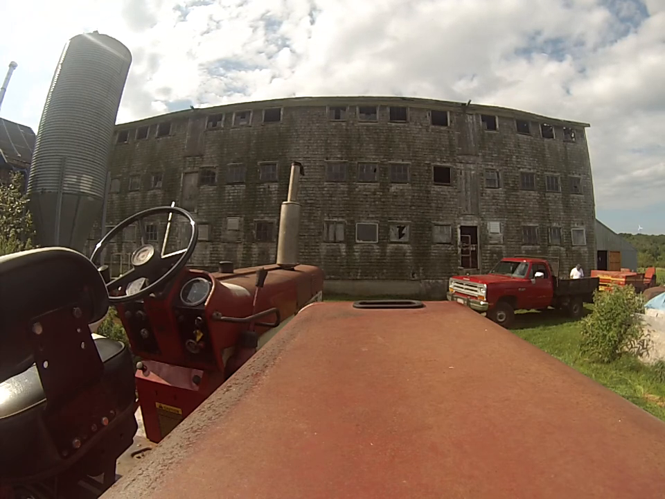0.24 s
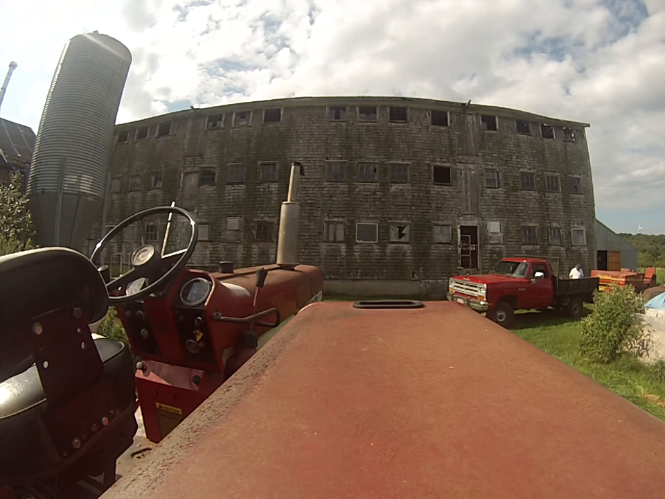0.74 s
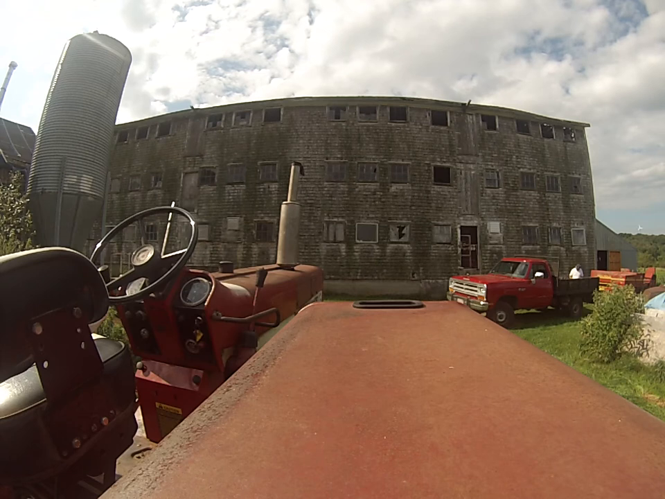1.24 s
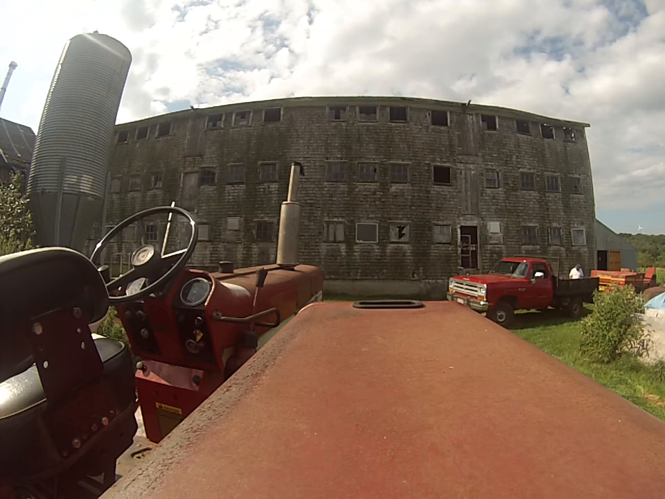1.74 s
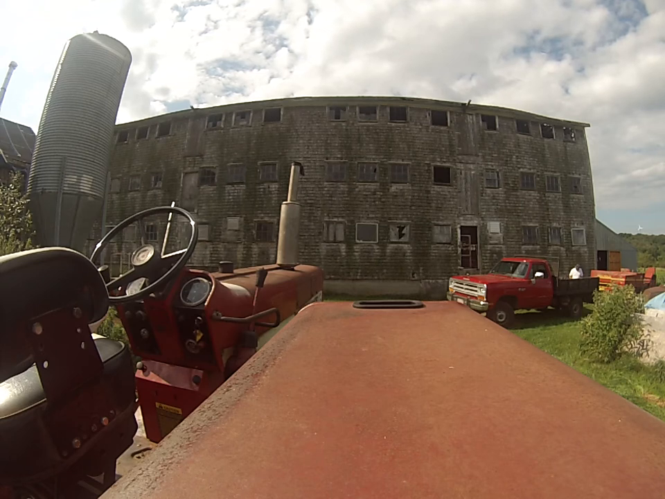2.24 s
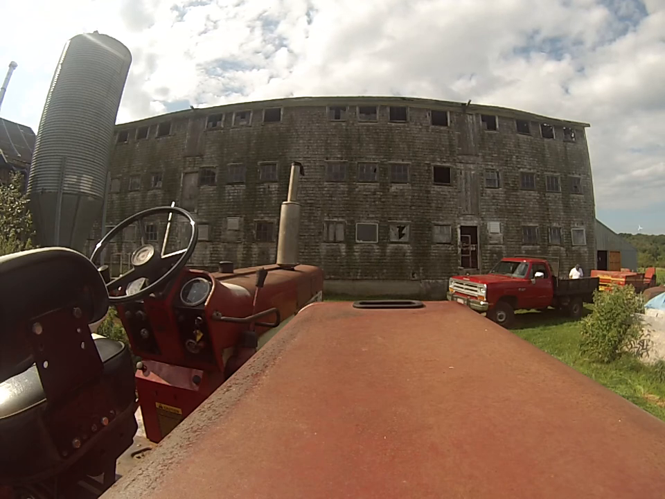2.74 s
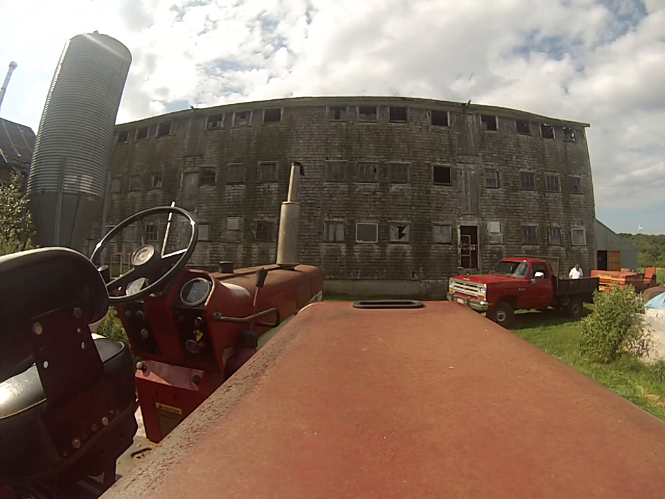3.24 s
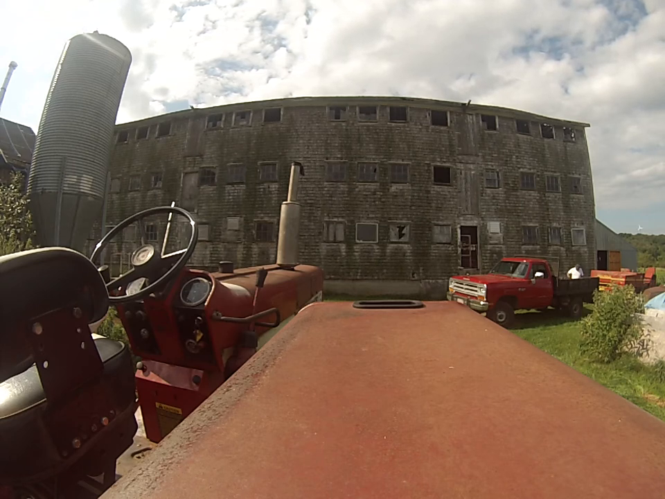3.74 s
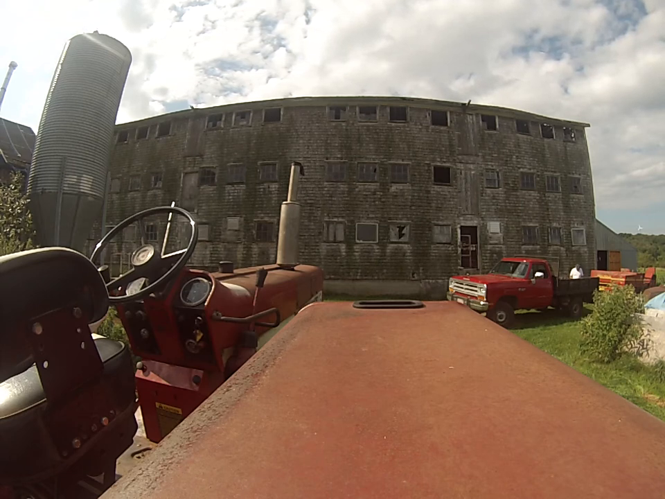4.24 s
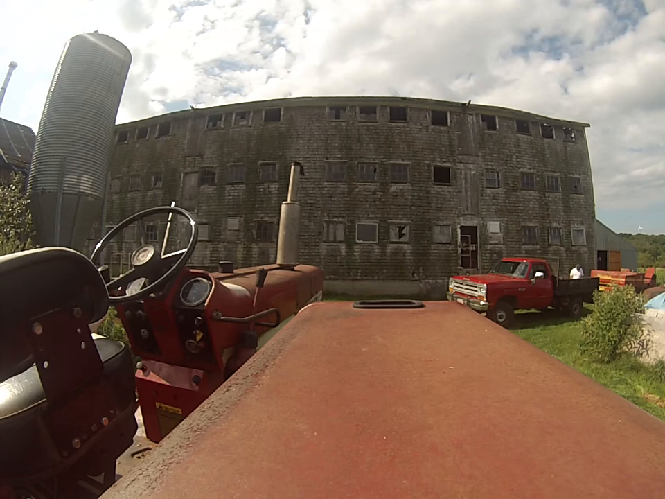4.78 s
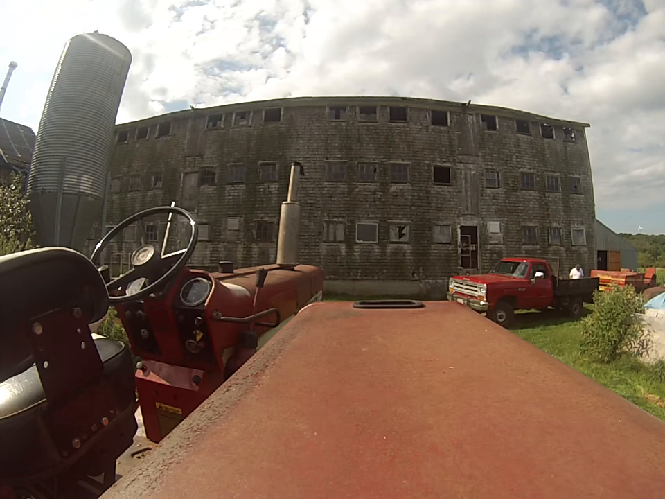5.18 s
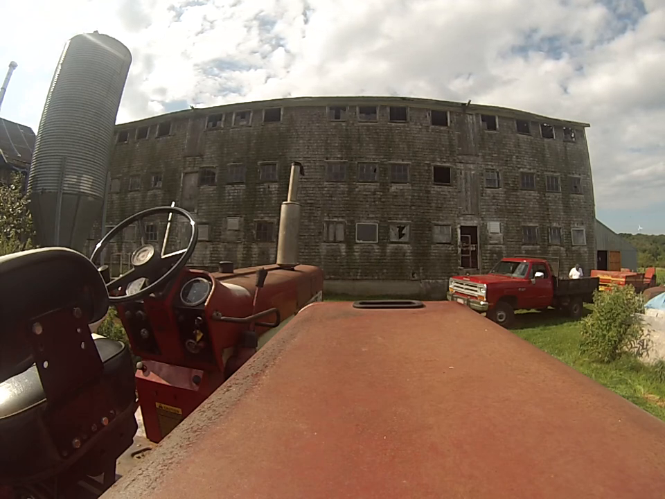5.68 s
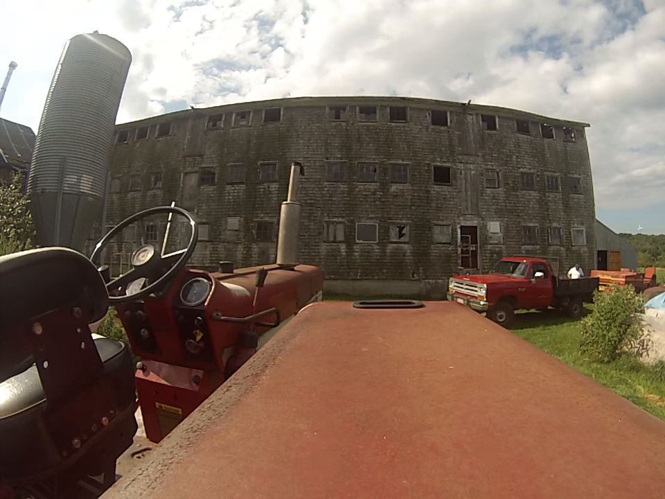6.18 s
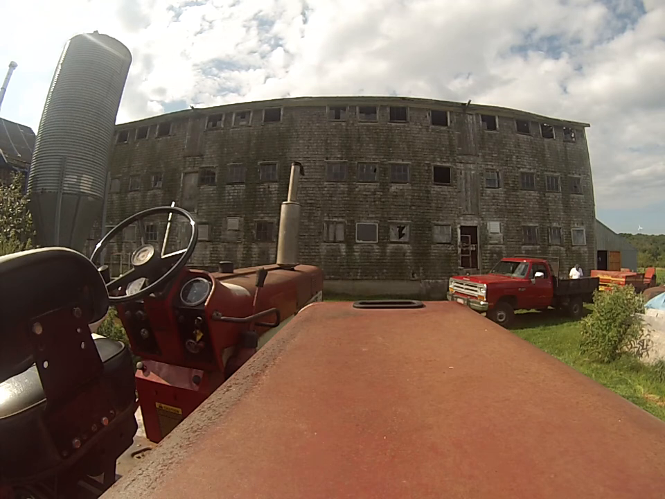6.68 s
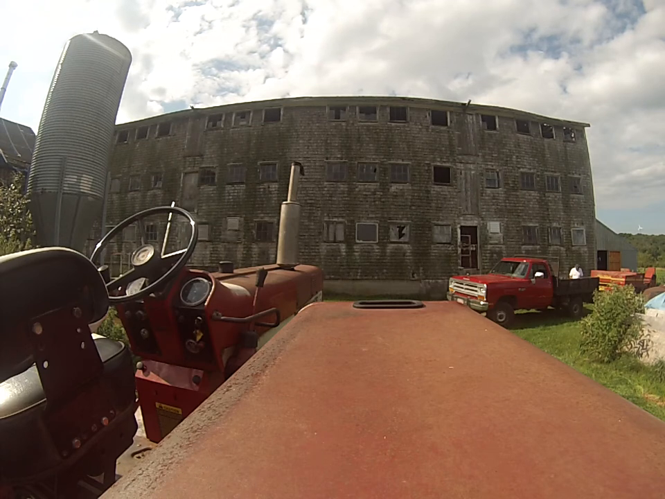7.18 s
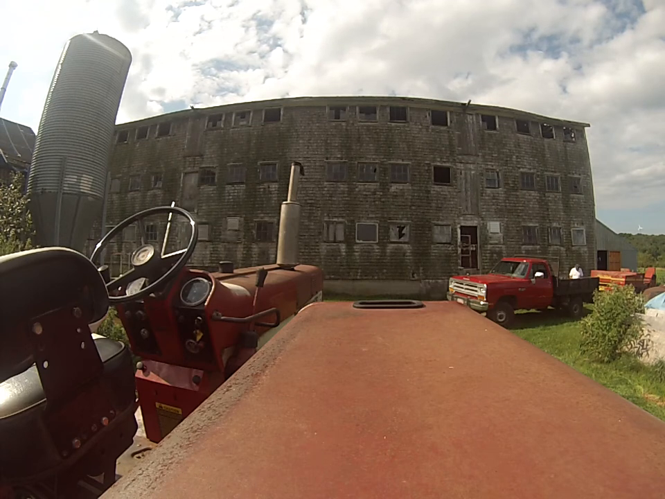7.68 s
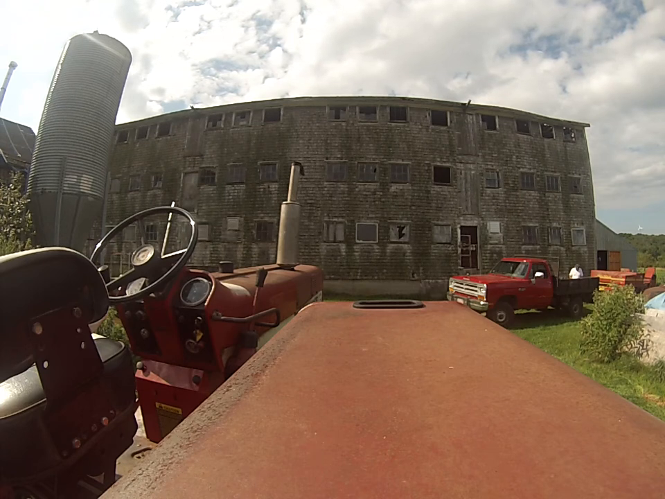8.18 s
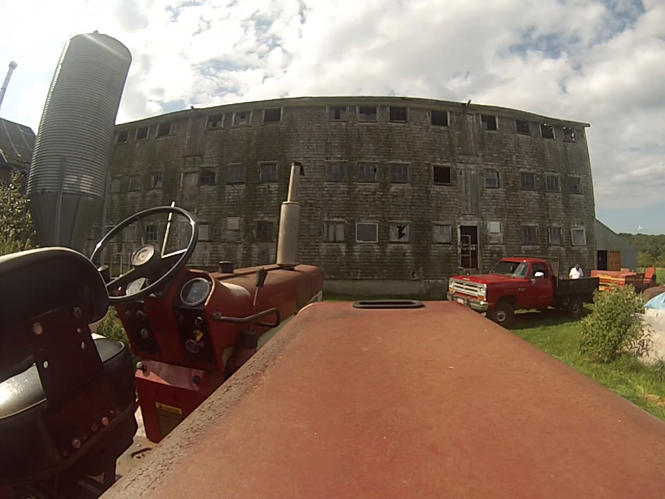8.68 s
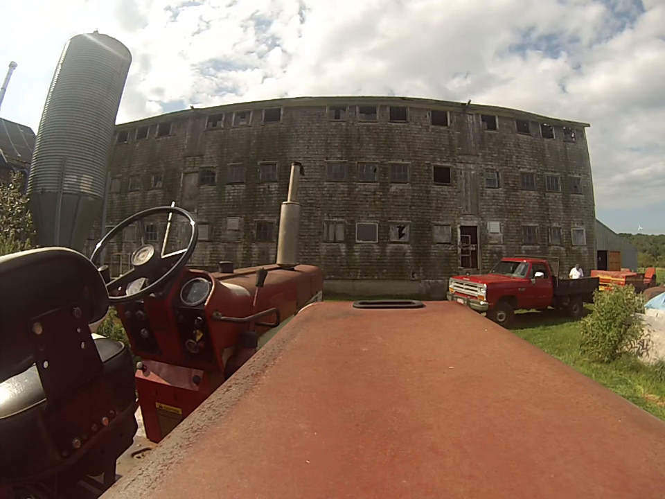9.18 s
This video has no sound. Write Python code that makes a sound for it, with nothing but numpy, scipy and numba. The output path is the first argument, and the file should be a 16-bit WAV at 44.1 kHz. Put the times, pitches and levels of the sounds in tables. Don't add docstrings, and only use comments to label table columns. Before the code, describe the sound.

A small camera's microphone sits outdoors in a breezy farmyard with parked, silent machinery. Throughout, ground crickets trill very high in fast, steady pulses, two near singers above a blurred crowd, with a slightly lower field cricket shimmer. Short double or triple chirps come near 0, 1, 2.2, 4.1, 6.1, 8 and 9.2 seconds. Distant barn hens form a hollow murmur, with soft clucks standing out in the first second, around 5 to 6, and at 8.7. Leaves and yard hum whisper beneath. Low wind rumbles unevenly, striking the microphone at 1.3 and hardest at 1.6, again at 3.9, easing, then thumping in a burst from 8.8 to 9.2. Near 5 a small bird drops three quick, faint notes. Faint low moans of air across a cavity rise slightly at 5.6, 6.6 and 8. The sound is almost mono, with little reverberation, and ends still breezy at about 9.4.

```python
import sys
import numpy as np
from scipy import signal
from scipy.fft import rfft, irfft
from scipy.io import wavfile
from scipy.ndimage import uniform_filter1d
from numba import njit

SR = 44100
rng = np.random.default_rng(int(sys.argv[2]) if len(sys.argv) > 2 else 0)


def waveform_to_disk(signal):
    frames = np.transpose(np.atleast_2d(signal))
    scaled = np.clip(frames, -1, 1) * 32767
    samples = np.round(scaled).astype(np.int16)
    wavfile.write(sys.argv[1], SR, samples)


def invert_db(level):
    return 10 ** (np.asarray(level, dtype=float) / 20)


N = 415422
T = np.arange(N) / SR


def level(x, db):
    return x * invert_db(db) / np.sqrt(np.mean(x ** 2))


def curve(rows):
    s, *columns = np.transpose(rows)
    return [np.interp(T, s, c) for c in columns]


def band(x, lo_hz, hi_hz, order=2):
    return signal.sosfilt(signal.butter(order, [lo_hz, hi_hz], "band", fs=SR, output="sos"), x)


def smooth(x, cutoff_hz):
    return signal.sosfilt(signal.butter(2, cutoff_hz, fs=SR, output="sos"), x)


def sparse(per_second):
    return (rng.random(N) < per_second / SR) * rng.standard_normal(N)


def walk(rate):
    k = int(SR / rate)
    held = np.repeat(rng.standard_normal(N // k + 1), k)
    return 1.3 * uniform_filter1d(uniform_filter1d(held, k), k)[:N]


def drift(rate):
    count = int(rate * N / SR) + 2
    return np.interp(T, np.arange(count) / rate, rng.standard_normal(count))


def coloured(points):
    hz, db = np.transpose(points)
    shape = invert_db(np.interp(np.log(np.fft.rfftfreq(N, 1 / SR) + 1), np.log(hz), db))
    return irfft(rfft(rng.standard_normal(N)) * shape, N)


def scatter(x, t60_s, wet_db):
    t = T[:SR // 4]
    tail = rng.standard_normal(len(t)) * np.exp(-np.log(1000) * t / t60_s)
    return x + invert_db(wet_db) * signal.fftconvolve(x, tail / np.sqrt(np.sum(tail ** 2)))[:N]


# frequency in Hz, spectrum level in dB per Hz.
YARD_SPECTRUM = [(60, -9.5), (200, 1), (400, -4), (700, -5), (1300, -10), (2200, -14.5), (3200, -15.5),
                 (4500, -18), (6000, -19.5), (8500, -29.5), (9500, -30), (13000, -34), (15500, -38.5)]


def distant_yard():
    return level(coloured(YARD_SPECTRUM), -57.5) * invert_db(0.53 * walk(1.3))


# time in seconds, level in dB.
LEAF_LEVELS = [
    (0.0, -66.5),
    (1.76, -65),
    (2.57, -64.5),
    (3.09, -65),
    (4.14, -64.5),
    (5.93, -66),
    (9.42, -65.5),
]


def leaf_rustle(yard):
    leaves_db = curve(LEAF_LEVELS)[0]
    swell = invert_db(1.4 * (leaves_db - leaves_db.mean()))
    return band(yard, 2000, 7100, order=1) * (swell - 1)


# frequency in Hz, spectrum level in dB per Hz.
SIDE_SPECTRUM = [(120, -39), (200, -10.5), (569, -1.5), (1000, -6.5), (1410, 0.5), (3500, 0), (5940, -2.5),
                 (7180, -8), (12000, -15.5), (15600, -44), (22000, -120)]


def side_hiss():
    return level(coloured(SIDE_SPECTRUM), -78.5)


# time in seconds, level in dB.
BREEZE_LEVELS = [(0.0, -47), (0.7, -49.5), (1.1, -53), (1.3, -54), (1.75, -42.5), (2.0, -47), (2.6, -50.5),
                 (3.4, -51.5), (3.75, -47), (4.2, -42), (4.7, -48.5), (5.05, -47), (5.4, -54.5),
                 (6.2, -50.5), (6.9, -52.9), (7.75, -55.3), (7.9, -44.5), (9.42, -45.5)]
# time in seconds, peak in dB, sharpness in dB, spread in ms.
WIND_PUFFS = [(0.144, -47.5, 4, 20), (0.317, -46, -14.0, 25), (0.549, -44, -6, 13),
              (0.861, -43.5, -1.7, 64), (0.994, -45.2, 3, 15), (1.286, -37, -1, 72), (1.57, -35, -3.3, 70),
              (1.619, -41.5, 6.5, 14), (2.097, -47.5, 1, 46), (2.307, -50, -1, 39), (2.58, -43.3, -7, 66),
              (3.057, -43, -7, 47), (3.885, -36, 2, 33), (4.146, -39.5, -1.6, 40), (4.839, -42, -2, 31),
              (4.973, -41.5, -6.5, 37), (5.356, -57, 6.5, 20), (5.605, -51.0, 3.5, 29), (5.88, -48, 0, 81),
              (6.27, -42, -0.5, 27), (6.522, -36, -0.8, 57), (6.69, -46, 0, 95), (6.995, -50.5, -4, 53),
              (7.996, -40.3, -0.5, 55), (8.425, -52.5, 9, 39), (8.61, -42.5, -3.5, 140),
              (8.821, -63, 15, 22), (8.89, -43, 2.5, 97), (9.03, -34.5, 3.5, 18), (9.151, -42, 6, 22)]


def gusts(db, follow, sharpen):
    calm_db, flicker_db = -48, 1.47
    power = invert_db(calm_db + follow * (curve(BREEZE_LEVELS)[0] - calm_db)) ** 2
    for s, peak_db, sharp_db, ms in WIND_PUFFS:
        bell = np.exp(-((T - s) * 1000 / ms) ** 2 / 2)
        power = power + invert_db(peak_db + sharpen * sharp_db) ** 2 * bell
    return np.sqrt(power) * invert_db(db + flicker_db * walk(16))


# low edge in Hz, high edge in Hz, level in dB,
# dB per dB of breeze, dB per dB of puff sharpness.
EDDY_SIZES = [
    (17.4, 56.7, 0.93, 0.93, -0.5),
    (50, 102.4, -4, 1.58, 1.18),
    (99.2, 182.7, -10.5, 1.26, 1.5),
    (183, 338, -23, 0.97, 2),
]


def wind():
    shared = sparse(150)
    out, even = 0, int(0.08 * SR)
    for lo_hz, hi_hz, db, follow, sharpen in EDDY_SIZES:
        eddies = smooth(band(0.71 * shared + sparse(300), lo_hz, hi_hz), 1.38 * hi_hz)
        local_power = uniform_filter1d(uniform_filter1d(eddies ** 2, even), even)
        evened = eddies / (local_power + 1e-12) ** 0.28
        out = out + level(evened, 0) * gusts(db, follow, sharpen)
    return out


@njit
def strokes(beats, sizes, top_hz, duty, droop, early):
    out, turn = np.zeros(len(beats)), 0.
    for i in range(len(beats)):
        k = np.floor(beats[i] + .5)
        size = sizes[int(k) % len(sizes)]
        u = (beats[i] - k) * 2 / duty
        if abs(u) < 1:
            uneven = .006 * np.sin(99 * size)
            turn += 2 * np.pi * top_hz * (1 + uneven - droop * (u + early) ** 2) / SR
            out[i] = size * (1 - u * u) * np.sin(turn)
        else:
            turn = 100 * size
    return out


def trill(beats, top_hz, duty, droop, early, scatter_db):
    sizes = invert_db(scatter_db * rng.standard_normal(400))
    return strokes(beats, sizes, 1. * top_hz, 1. * duty, 1. * droop, 1. * early)


# time in seconds, strokes ahead of a steady beat
STROKE_LEADS = [(0.0, -0.4, 0.04), (0.6, -0.33, 0.0), (1.2, -0.34, -0.03), (1.8, -0.21, -0.1),
                (2.4, -0.34, -0.18), (3.0, -0.41, -0.28), (3.6, -0.3, -0.29), (4.2, -0.25, -0.41),
                (4.8, -0.14, -0.33), (5.4, -0.06, -0.29), (6.0, -0.1, -0.17), (6.6, -0.03, -0.13),
                (7.2, -0.16, -0.06), (7.8, -0.19, -0.21), (8.4, -0.21, -0.23), (9.0, -0.2, -0.2),
                (9.42, -0.14, -0.21)]


def ground_crickets(count):
    lower, higher = curve(STROKE_LEADS)
    lower, higher = 18.6 * T + lower, 18.2 * T + higher
    near = level(trill(lower, 8020, .4, .065, .3, scatter_db=.9), -64.2)
    near = near + level(trill(higher, 8620, .5, .09, .05, scatter_db=.9), -72.5)
    crowd = 0
    for k, (pace, start) in enumerate(rng.random((count, 2))):
        depth = (k + .5) / count
        beats = (14 + 7.0 * pace) * T + start + .08 * drift(1.2)
        top_hz = 8420 - 2200 * depth ** 1.2
        singer = trill(beats, top_hz, .45, 0.068, 0.284, scatter_db=1.5)
        crowd = crowd + invert_db(-22 * (depth - .35) ** 2) * singer
    blur = band(rng.standard_normal(N), 6970, 8140)
    return scatter(near, 0.12, -12) + level(crowd, -61) + level(blur, -68)


def add_cluck(track, s, long_s, start_hz, end_hz, db, next_db):
    u = np.linspace(0, 1, int(long_s * SR))
    quaver_hz = 4.0 * np.interp(u, np.linspace(0, 1, 8), rng.standard_normal(8))
    hz = start_hz + (end_hz - start_hz) * u + quaver_hz
    turn = 2 * np.pi * np.cumsum(hz) / SR / 3
    note = np.sin(3 * turn) + invert_db(next_db) * np.sin(4 * turn) + invert_db(-28.0) * np.sin(2 * turn)
    i = int(s * SR)
    track[i:i + len(u)] += invert_db(db + 2.5) * np.sin(np.pi * u) ** 0.35 * note


# start in seconds, length in seconds, loudest overtone in Hz,
# level in dB, next overtone in dB.
HEN_CALLS = [(.228, .145, 988, -52, -11), (.475, .045, 1008, -56.5, -20), (.625, .045, 1030, -52.5, -20),
             (.668, .045, 1010, -52, -20), (.725, .04, 1075, -57, -20), (.785, .16, 1088, -57.5, -20),
             (1.05, .07, 400, -61, -6), (3.69, .13, 1103, -56.5, -20), (5.07, .21, 998, -53, -16),
             (5.12, .14, 1095, -57, -20), (5.07, .1, 1180, -63, -20), (5.27, .07, 1055, -59, -20),
             (5.58, .075, 990, -53.5, -20), (6.06, .09, 1012, -60, -20), (6.15, .2, 1084, -56.5, -20),
             (8.65, .17, 1086, -56, -20)]
# time in seconds, level in dB.
FLOCK_LEVELS = [(0.0, -64), (0.3, -59), (0.5, -56.5), (0.78, -57), (1.15, -60), (1.44, -62), (1.89, -56.5),
                (3.17, -59.5), (3.83, -56.5), (4.51, -58.5), (5.22, -55.5), (5.85, -59), (6.5, -56.5),
                (7.08, -59.5), (7.42, -57.5), (8.4, -59.5), (9.02, -60), (9.42, -58.5)]


def hens(count):
    calls, flock = np.zeros((2, N + SR))
    for s, long_s, hz, db, next_db in HEN_CALLS:
        add_cluck(calls, s, long_s, hz, hz - 4.5, db, next_db)
    for s, long, pitch, glide, db in zip(*rng.random((2, count)), *rng.standard_normal((3, count))):
        hz = 980 * np.exp(.11 * pitch)
        add_cluck(flock, s * N / SR, 0.014 + 0.034 * long, hz, hz * (1 + 0.025 * glide), 2.0 * db, -14)
    roar = level(band(rng.standard_normal(N), 737, 1144), -2.97) + level(flock[:N], -4.5)
    murmur = roar * invert_db(curve(FLOCK_LEVELS)[0] - 0.16)
    return murmur + scatter(calls[:N] * invert_db(1.2 + 1.3 * walk(35)), .12, -16)


# last pulse in seconds, number of pulses, spacing in ms, peak in dB.
NEAR_CHIRPS = [
    (.0841, 2, 46, -50),
    (.9915, 3, 47, -48),
    (2.173, 2, 43.5, -48.5),
    (4.1065, 2, 46.5, -50.5),
    (6.1149, 2, 48.5, -48.5),
    (8.0231, 2, 45.5, -50),
    (9.209, 2, 43, -48.5),
]


def field_crickets(count):
    crowd = 0
    for pitch, pace, start, bout in zip(*rng.standard_normal((1, count)), *rng.random((3, count))):
        bouts = np.sin(2 * np.pi * ((1.5 + 1.5 * bout) * T + start))
        chirping = np.clip(2.0 + 2.4 * bouts, 0, 1)
        beats = (21 + 6.0 * pace) * T + start
        top_hz = 5260 + 110 * np.clip(pitch, -1.6, 1.6)
        crowd = crowd + chirping * trill(beats, top_hz, .4, 0.034, 0.54, scatter_db=1.5)
    shimmer = band(rng.standard_normal(N), 4980, 5310, order=1)
    out = level(crowd, -71.5) + level(shimmer, -70)
    t = T[:SR // 25]
    for s, pulses, ms, db in NEAR_CHIRPS:
        for k in range(pulses):
            hz = 5160 - 10 * k
            tone = np.sin(2 * np.pi * hz * (1.001 * t - 0.43 * t ** 2))
            pulse = np.sin(np.pi * np.clip(t / 0.013, 0, 1)) * tone
            i = int((s - k * ms / 1000 - .003) * SR)
            out[i:i + len(t)] += invert_db(db - 3.0 - 1.6 * k ** 2.8) * pulse
    return out


# time in seconds, peak in dB, width in ms, push +1 or pull -1.
STRONG_EDDIES = [
    (1.2806, -30, 3.0, 1),
    (1.5805, -33, 2.7, 1),
    (1.6109, -22.3, 5.0, 1),
    (3.875, -27, 9.0, 1),
    (3.8925, -24, 4.2, -1),
    (8.811, -27, 2.7, 1),
    (8.843, -37, 2.2, -1),
    (9.025, -33, 2.0, 1),
    (9.033, -24.5, 7.0, -1),
    (9.163, -27, 4.0, 1),
]


def thumps(stream):
    out = stream
    snaps = level(band(sparse(450), 295, 456), -30)
    for s, db, ms, sign in STRONG_EDDIES:
        u = (T - s) / (ms / 1500)
        core = (1 - 0.57 * u ** 2) * np.exp(-u ** 2 / 2)
        out = out * (1 - 0.68 * np.exp(-u ** 2 / 14)) + sign * invert_db(db + 0.7) * core
        edge = sign * invert_db(-15) * np.exp(-4.0 * abs(u)) + snaps * np.exp(-((T - s) / 0.02) ** 2)
        out = out + invert_db(db) * edge * (3 / ms) ** 2.54
    return out


# start in seconds, length in seconds, start in Hz, end in Hz, level in dB.
BIRD_NOTES = [
    (4.918, .054, 4500, 3380, -66),
    (5.054, .05, 5200, 3420, -65),
    (5.135, .03, 5260, 4670, -66),
]


def bird():
    out = np.zeros(N)
    for s, long_s, start_hz, end_hz, db in BIRD_NOTES:
        u = np.linspace(0, 1, int(long_s * SR))
        hz = end_hz + (start_hz - end_hz) * (1 - u) ** 2.2
        note = np.sin(np.pi * u) ** 0.4 * np.sin(2 * np.pi * np.cumsum(hz) / SR)
        i = int(s * SR)
        out[i:i + len(u)] = invert_db(db - 1) * note
    return scatter(out, .15, -12)


# start in seconds, length in seconds, centre in Hz, level in dB.
CAVITY_MOANS = [
    (5.564, 0.43, 281, -59.5),
    (6.553, 0.46, 275.6, -58.5),
    (7.996, .42, 288, -65),
]


def moans():
    out = np.zeros(N)
    wobble = smooth(rng.standard_normal((2, N)), 42)
    for s, long_s, hz, db in CAVITY_MOANS:
        u = np.clip((T - s) / long_s, 0, 1)
        turn = 2 * np.pi * np.cumsum(hz + 14 * (u - .5)) / SR
        hum = wobble[0] * np.cos(turn) + wobble[1] * np.sin(turn)
        out = out + level(hum, db) * np.sin(np.pi * u) ** 0.48
    return out


def scene():
    yard = distant_yard()
    mid = yard + leaf_rustle(yard) + thumps(wind()) + moans()
    mid = mid + ground_crickets(count=40) + hens(count=1200) + field_crickets(count=24) + bird()
    side = side_hiss()
    return np.array([mid + side, mid - side])


def roll_off(x):
    return signal.sosfilt(signal.butter(12, 15170, fs=SR, output="sos"), x)


def record(dry):
    return roll_off(dry)


dry = scene()
out = record(dry)
waveform_to_disk(out)
```